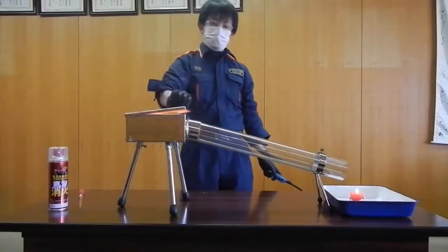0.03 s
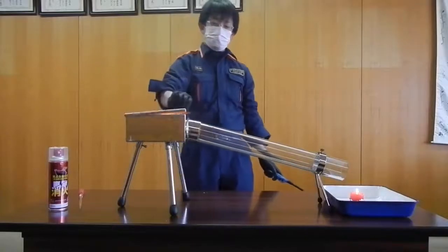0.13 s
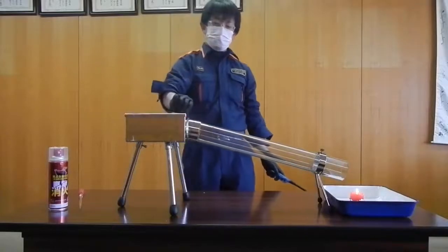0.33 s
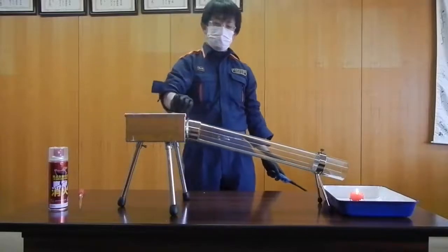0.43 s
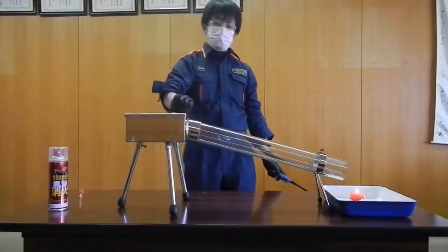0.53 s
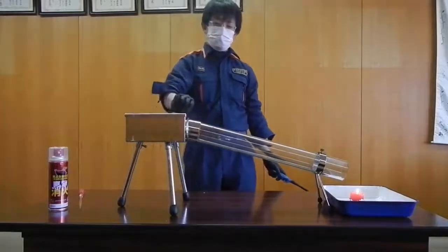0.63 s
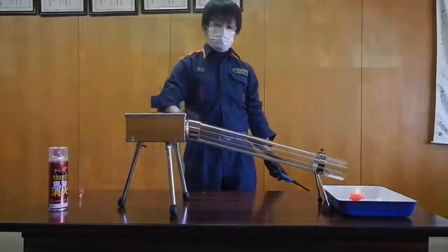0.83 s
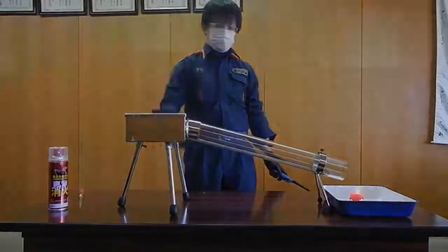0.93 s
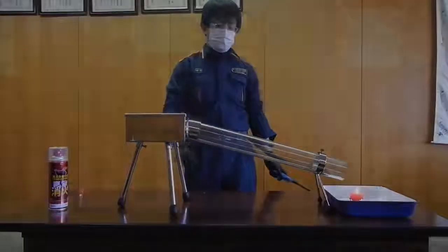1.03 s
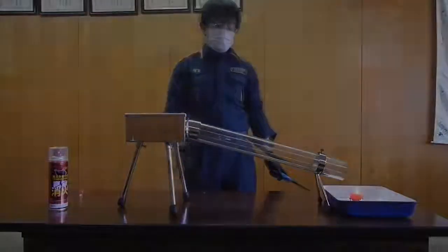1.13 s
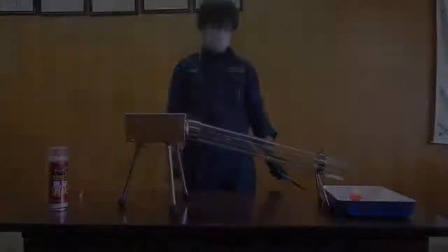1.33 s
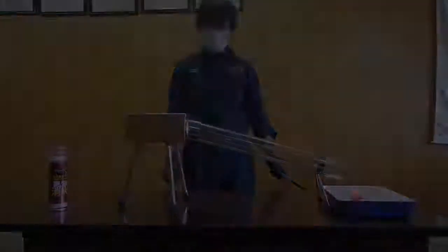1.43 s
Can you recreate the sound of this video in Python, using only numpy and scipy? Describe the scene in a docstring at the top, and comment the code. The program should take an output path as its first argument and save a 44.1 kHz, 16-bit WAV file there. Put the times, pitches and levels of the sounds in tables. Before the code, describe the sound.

A wooden lid slides briefly and drops shut on a small box with a sharp clack.

```python
"""A lid slides and drops shut on a small wooden box, on a table in a panelled room. Its edges land in turn with
a sharp clack; the panels ring, the hollow box booms, the room reverberates. A sleeve brushes as the hand
withdraws. Behind it: ventilation noise, a few faint low thumps and a thin electrical whine. The level dips
briefly and fades at the end."""
import sys
import numpy as np
from scipy import signal
from scipy.io import wavfile

SR = 44100
rng = np.random.default_rng(int(sys.argv[2]) if len(sys.argv) > 2 else 0)


def log_audio(samples):
    """Write samples as a 16-bit WAV file to the path given in sys.argv[1]."""
    # one column per channel
    frames = np.atleast_2d(samples).T
    # limit to full scale, then quantise
    limited = np.clip(frames, -1, 1)
    pcm = np.round(limited * 32767).astype(np.int16)
    wavfile.write(sys.argv[1], SR, pcm)


N = 66150
TIME_S = np.arange(N) / SR

# ventilation spectrum: freq_hz, relative_density_db
AIR_SPECTRUM = [(25, -24.5), (45, -6), (72, 1), (105, -5.5), (170, -0.5), (245, -15.5), (400, 1),
                (530, -5.5), (850, -11), (1600, -14), (2800, -23), (5900, -28.5), (12000, -31),
                (14500, -31.5)]
# left-right likeness of air and sleeve: freq_hz, correlation
AIR_CORRELATION = [(60, 0.73), (400, 0.71), (1400, 0.59), (3100, 0.49), (6800, .1), (14000, .1)]
# faint low thumps: centre_s, level_db
LOW_THUMPS = [(.08, -46), (0.699, -54), (0.753, -52), (.85, -48), (1.035, -47), (1.201, -47.5)]
# lid resonances under friction: pitch_hz, width_hz, level_db
SLIDE_RESONANCES = [(380, 70, -52), (810, 50, -51), (1150, 200, -54), (1740, 110, -52), (2650, 300, -57)]
# hard-edge resonances: pitch_hz, width_hz, relative_db
SNAP_RESONANCES = [(6720, 160, 0), (7520, 400, -3), (8950, 800, -3), (11800, 1500, -11)]
# lid-on-rim contacts: start_s, relative_db, lowpass_hz, t60_s
RIM_CONTACTS = [(0.2094, -3, 11000, .085), (0.2155, 0, 2800, .05), (0.2192, 2, 3600, .045),
                (0.2246, -3, 2000, .05)]
# dense wood modes: freq_hz, relative_density_db
CLACK_SPECTRUM = [(50, -33), (90, -25), (140, -10.5), (350, 3.5), (700, -4.5), (1500, -9), (2700, 0.5),
                  (4000, -3), (5300, -10.5), (7200, -3.5), (9000, -5.5), (12000, -9.5), (15000, -15)]
# broad lid resonances: pitch_hz, double_width_hz, unscaled_lift_db
LID_FORMANTS = [(640, 35, 6), (890, 45, 5), (957, 35, 8), (1208, 30, 7), (1345, 60, 6), (1400, 25, 7),
                (1720, 35, 6), (1850, 70, 6), (2500, 110, 6), (2700, 60, 7), (3330, 280, 5), (4250, 200, 6),
                (5970, 130, 9), (6716, 90, 10), (7520, 160, 9), (8950, 450, 8)]
# lid and wall modes: pitch_hz, relative_db, t60_s
WOOD_MODES = [(642, -27.5, .52), (956, -29, .4), (1044, -33, .42), (1206, -25.5, .38), (1343, -27, .35),
              (1400, -27, .46), (1566, -34, .4), (1716, -29, .37), (2492, -29, .38), (2541, -30, .33),
              (2694, -27.5, .31), (3262, -31, .28), (4188, -34, .42), (4317, -34, .38)]
# low modes of box, table and room: pitch_hz, relative_db, t60_s
LOW_MODES = [(146, -27, .65), (162, -28, .3), (176, -29, .35), (194, -26, .58), (310, -25, .32),
             (327, -23, .38), (339, -29, .6), (383, -28, .6), (425, -35, .7), (473, -30, .7),
             (521, -34, .6)]
# left-right likeness of the knock: freq_hz, correlation
KNOCK_CORRELATION = [(150, .98), (400, .97), (1200, .97), (2600, .88), (4500, .65), (8000, .15),
                     (14000, .15)]
# knock balance: freq_hz, left_minus_right_db
KNOCK_PAN = [(200, -.6), (2400, -.4), (4800, 3.2), (8500, 2), (12500, -3.5)]
# reverberation spectrum: freq_hz, relative_density_db
ROOM_SPECTRUM = [(30, -45), (60, -31.5), (110, -20), (170, 2), (245, -21), (350, 1), (500, -1), (760, -5),
                 (1300, -3.5), (2000, -5), (3000, -6.5), (5200, -12.5), (7500, -17), (11000, -11.5),
                 (15000, -24)]
# reverberation time: freq_hz, t60_s
ROOM_DECAY = [(150, 1), (450, 0.97), (1300, 0.46), (3500, 0.51), (8000, 0.46), (14000, 0.15)]
# cloth spectrum: freq_hz, relative_density_db
SLEEVE_SPECTRUM = [(300, -6), (1600, 6), (3500, -14), (7000, -12), (12000, -9), (15000, -23)]
# overall gain: time_s, gain_db
GAIN_CURVE = [(0, -1), (.3, 1.5), (.75, -0.5), (1.0, -4), (1.23, -6.5), (1.35, -10.5), (1.5, -12.5)]

LANDING_S = RIM_CONTACTS[0][0]


def from_db(db):
    """Decibels to gain."""
    return 10 ** (np.asarray(db) / 20)


def at_hz(table, hz):
    """Table lookup on a log-frequency axis."""
    freqs_hz, values = np.transpose(table)
    return np.interp(np.log(hz), np.log(freqs_hz), values)


def decay(start_s, t60_s, rise_s):
    """Envelope: exponential rise and decay."""
    age_s = np.maximum(TIME_S - start_s, 0)
    return (1 - np.exp(-age_s / rise_s)) * np.exp(-np.log(1000) * age_s / t60_s)


def pan(left_minus_right_db):
    """Left and right gains."""
    return from_db(np.array([[1], [-1]]) * left_minus_right_db / 2)


def resonance(x, hz, width_hz):
    """Band-pass, unity gain at centre."""
    return signal.lfilter(*signal.iirpeak(hz, hz / width_hz, fs=SR), x + 1e-18)


def noise_tone(noise, hz, width_hz):
    """Noise through one resonance twice; rms 1."""
    tone = resonance(resonance(noise, hz, width_hz), hz, width_hz)
    return tone / tone.std()


def noise_bands(spectrum, correlation):
    """Third-octave stereo noise as (hz, band); total rms 1."""
    edges_hz = 22 * 2 ** (np.arange(30) / 3)
    centres_hz = np.sqrt(edges_hz[1:] * edges_hz[:-1])
    gains = from_db(at_hz(spectrum, centres_hz)) * np.sqrt(np.diff(edges_hz))
    gains /= np.linalg.norm(gains)
    white = rng.standard_normal((2, 2, N + SR // 4))
    for k, hz in enumerate(centres_hz):
        bandpass = signal.butter(3, edges_hz[k:k + 2], "band", fs=SR, output="sos")
        band = signal.sosfilt(bandpass, white[k % 2])[:, -N:]
        mid, side = band / band.std(axis=1, keepdims=True)
        alike = at_hz(correlation, hz)
        stereo = np.sqrt((1 + alike) / 2) * mid + np.sqrt((1 - alike) / 2) * side * [[1], [-1]]
        yield hz, gains[k] * stereo


def ringing(modes, start_s, rise_s):
    """Decaying sines; left-right phase gap grows with pitch."""
    out = np.zeros((2, N))
    signs = np.sign(rng.standard_normal((len(modes), 2)))
    for (hz, db, t60_s), (polarity, lead) in zip(modes, signs):
        offset_rad = lead * np.arccos(at_hz(KNOCK_CORRELATION, hz)) / 2
        phase_rad = 2 * np.pi * hz * (TIME_S - start_s) + [[offset_rad], [-offset_rad]]
        gains = polarity * from_db(db) * pan(at_hz(KNOCK_PAN, hz))
        out += gains * decay(start_s, t60_s, rise_s) * np.sin(phase_rad)
    return out


def ventilation(level_db=-45.5, top_hz=13100):
    """Steady air noise, mostly low."""
    air = sum(band for _, band in noise_bands(AIR_SPECTRUM, AIR_CORRELATION))
    lowpass = signal.cheby1(8, .5, top_hz, fs=SR, output="sos")
    return from_db(level_db) * signal.sosfilt(lowpass, air)


def electrical_whine(pitch_hz=14835, level_db=-66, waver_db=1.2, pan_db=10):
    """Thin sine on the left, wavering in level."""
    waver = np.interp(TIME_S, np.linspace(0, N / SR, 40), rng.standard_normal(40))
    return pan(pan_db) * from_db(level_db + waver_db * waver) * np.sin(2 * np.pi * pitch_hz * TIME_S)


def low_thumps(mean_hz=75, half_length_s=.017):
    """Faint low thumps: a few cycles each, pitch varying."""
    out = np.zeros(N)
    for centre_s, db in LOW_THUMPS:
        hz = mean_hz * (1 + .116 * rng.standard_normal())
        offset_s = TIME_S - centre_s
        swell = np.exp(-(offset_s / half_length_s) ** 2)
        out += from_db(db) * swell * np.sin(2 * np.pi * hz * offset_s)
    return out


def lid_slide(start_s=.122, end_s=.21, ramp_s=.02):
    """Friction on the rim excites a few lid resonances."""
    friction = rng.standard_normal(N)
    rub = sum(from_db(db) * noise_tone(friction, hz, width_hz) for hz, width_hz, db in SLIDE_RESONANCES)
    inside_s = np.minimum(TIME_S - start_s, end_s - TIME_S)
    return rub * np.clip(inside_s / ramp_s + .5, 0, 1)


def edge_snap(gain_db=-23.5):
    """The hard edge lands first: bright, short-lived resonances."""
    crack = rng.standard_normal((2, N))
    snap = sum(from_db(db) * pan(at_hz(KNOCK_PAN, hz)) * noise_tone(crack, hz, width_hz)
               for hz, width_hz, db in SNAP_RESONANCES)
    return from_db(gain_db) * snap * decay(LANDING_S, t60_s=.16, rise_s=.0016)


def lid_clack(gain_db=-15.5):
    """Contacts briefly ring the dense wood modes; the first is bright, the later ones duller."""
    wood = sum(band * pan(at_hz(KNOCK_PAN, hz))
               for hz, band in noise_bands(CLACK_SPECTRUM, KNOCK_CORRELATION))
    out = np.zeros((2, N))
    for k, (start_s, db, lowpass_hz, t60_s) in enumerate(RIM_CONTACTS):
        fresh_noise = np.roll(wood, k * SR // 10, axis=1)
        burst = fresh_noise * decay(start_s, t60_s, rise_s=.0002)
        lowpass = signal.butter(1, lowpass_hz, fs=SR, output="sos")
        out += from_db(gain_db + db) * signal.sosfilt(lowpass, burst + 1e-18)
    return out


def lid_colour(x, lift_scale=1.03):
    """Boost at the lid's broad resonances."""
    for hz, double_width_hz, lift_db in LID_FORMANTS:
        x = x + (from_db(lift_scale * lift_db) - 1) * resonance(x, hz, double_width_hz / 2)
    return x


def panel_ring(gain_db=-.5):
    """Lid and walls ring from the first contact."""
    return from_db(gain_db) * ringing(WOOD_MODES, LANDING_S, rise_s=.0051)


def box_boom(gain_db=-1):
    """Hollow box, table and room resonate as the lid seats."""
    return from_db(gain_db) * ringing(LOW_MODES, start_s=.214, rise_s=.0046)


def room_tail(gain_db=-23.5, delay_s=.01):
    """Diffuse reflections of the knock; lows last longest."""
    out = np.zeros((2, N))
    for hz, band in noise_bands(ROOM_SPECTRUM, KNOCK_CORRELATION):
        envelope = decay(LANDING_S + delay_s, at_hz(ROOM_DECAY, hz), rise_s=.0017)
        out += band * pan(at_hz(KNOCK_PAN, hz)) * envelope
    return from_db(gain_db) * out


def sleeve_brush(centre_s=.898, half_length_s=.047, level_db=-54.5):
    """One swell of cloth noise as the hand withdraws."""
    cloth = sum(band for _, band in noise_bands(SLEEVE_SPECTRUM, AIR_CORRELATION))
    swell = np.exp(-((TIME_S - centre_s) / half_length_s) ** 2)
    return from_db(level_db) * swell * cloth


def scene():
    """The closing lid over the room's background."""
    knock = edge_snap() + lid_colour(lid_clack() + room_tail()) + panel_ring() + box_boom()
    return knock + lid_slide() + low_thumps() + sleeve_brush() + ventilation() + electrical_whine()


def record(dry):
    """Soft clip, one brief dip, fade, low-pass."""
    ceiling, cutoff_hz = .8, 15800
    dip_s, depth_db, fall_s, recover_s = .5715, -22, .011, .014
    clipped = ceiling * np.tanh(dry / ceiling)
    tau_s = np.where(TIME_S < dip_s, fall_s, recover_s)
    dip_db = depth_db * np.exp(-np.abs(TIME_S - dip_s) / tau_s)
    fade_db = np.interp(TIME_S, *np.transpose(GAIN_CURVE))
    lowpass = signal.ellip(10, .1, 80, cutoff_hz, fs=SR, output="sos")
    return signal.sosfilt(lowpass, clipped * from_db(fade_db + dip_db))


dry = scene()
out = record(dry)
log_audio(out)
```